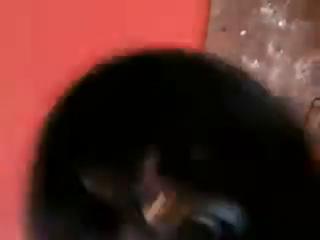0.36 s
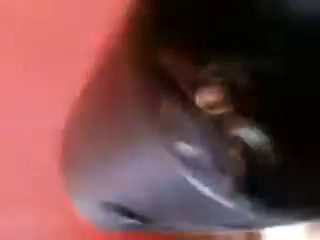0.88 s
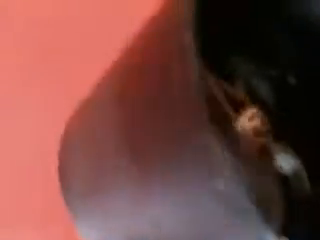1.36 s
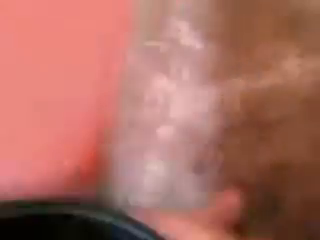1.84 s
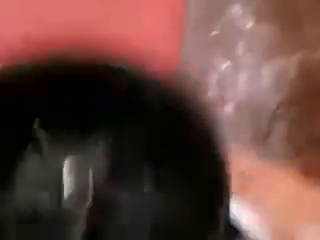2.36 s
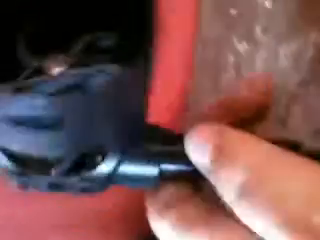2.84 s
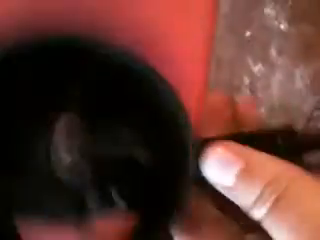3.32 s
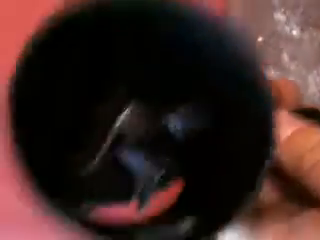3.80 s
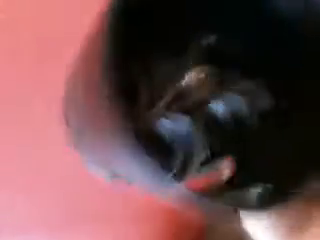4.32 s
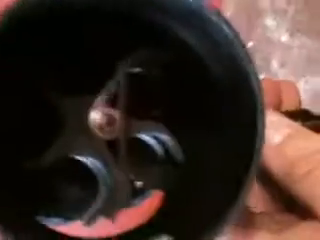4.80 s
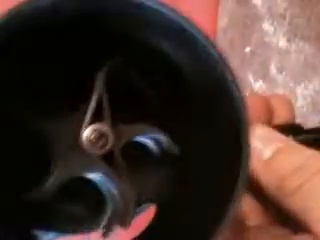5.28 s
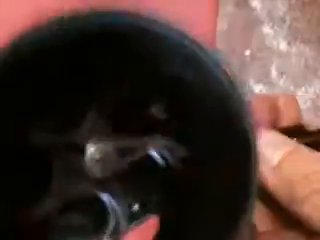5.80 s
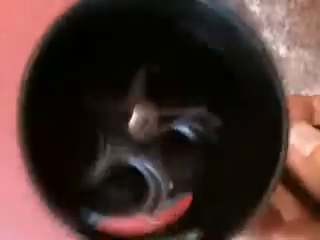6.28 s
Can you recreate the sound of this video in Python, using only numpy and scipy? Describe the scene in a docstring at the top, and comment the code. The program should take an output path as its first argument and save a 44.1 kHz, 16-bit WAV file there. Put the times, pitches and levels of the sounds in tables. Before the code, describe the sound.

Outdoors, very close to a small, thin-sounding microphone, an empty paintball marker is worked by hand over a faint far wash, wavering hiss and barely audible high whine. Tiny ticks and soft rubs open it. At 0.95 s the bolt slams with a loud, hard clack, ringing the hollow plastic hopper. Rubbing follows, then at 1.86 s a sharp strike releases a short whistling gas burst, with a weak thud. From 2.2 to 2.6 s only faint rustles; light knocks from 2.8 s. A quick scrape leads to a clack at 3.57 s, then ticks and rubs. The pace quickens: gas burst at 4.37, squeaky slide and deep clack at 4.8, burst at 5.1, clack at 5.45, burst at 5.87, clack at 6.24 s. Bursts die within about a tenth of a second, thuds just after. Short wall echoes trail; small knocks and a rub end it around 6.6 s.

```python
"""A paintball marker's bolt slams home with a clack that rings the hollow plastic hopper.
Blows are short bursts of noise plus fading tones; the bolt's slides and rubbing hands are uneven noise.
The empty marker is worked by hand close to a small microphone, and gas bursts out as whistling noise.
Outdoors, a wall echoes it all, over faint rustles, a quiet far wash, a nearer hiss and a thin whine."""
import sys
import numpy as np
from scipy import signal
from scipy.fft import rfft, irfft
from scipy.io import wavfile
from scipy.ndimage import uniform_filter1d

SR = 44100
rng = np.random.default_rng(int(sys.argv[2]) if len(sys.argv) > 2 else 0)


def to_wav(s):
    """Save 16-bit WAV."""
    ch = np.atleast_2d(s).T  # columns
    pcm = np.round(np.clip(ch, -1, 1) * 32767)  # PCM
    wavfile.write(sys.argv[1], SR, pcm.astype(np.int16))


def gain_from_db(level_db):
    """Convert decibel levels to linear amplitude factors (20 dB per decade)."""
    decades = np.asarray(level_db, float) / 20
    return 10 ** decades


N = 293020  # length in samples

# The tones (modes) that the body and hopper ring with.
# Each row: pitch in Hz, relative level in dB, basic ring time in seconds.
BODY_MODES = [(179.2, 0.5, 0.19), (220.3, 9, 0.12), (283.6, 8.5, 0.14), (366, 6, 0.026), (381.5, 5.5, 0.13),
              (442.4, -7.5, 0.13), (503.3, -3, 0.16), (589, 8, 0.056), (707, -4, 0.18), (830, -5, 0.12),
              (1135, 0.5, 0.091), (1410, -18.5, 0.066), (1640, -15, 0.15), (2050, -16.5, 0.13)]


def evened(x):
    """Scales a sound to an average strength (rms) of 1."""
    return x / np.sqrt(np.mean(x ** 2) + 1e-20)


def read(points, hz):
    """Reads a table between its points, with pitch on a log scale as we hear it."""
    f, value = np.transpose(points)
    return np.interp(np.log(hz + 1), np.log(f + 1), value)


def add(mix, s, sound):
    """Mixes a sound in at second s."""
    part = mix[max(round(s * SR), 0):][:len(sound)]
    part += sound[:len(part)]


def noise(spectrum):
    """Random noise of rms 1, coloured by a table of level against pitch."""
    hz = np.fft.rfftfreq(N, 1 / SR)
    white_spectrum = rfft(rng.standard_normal(N))
    return evened(irfft(white_spectrum * gain_from_db(read(spectrum, hz)), N))


def resonate(x, hz, width):
    """A resonance of gain 1: shifts the pitch hz down to zero, smooths, and shifts back."""
    turn = np.exp(2j * np.pi * np.cumsum(hz * np.ones(len(x))) / SR)
    r = np.exp(-np.pi * width / SR)
    smooth = signal.lfilter([1 - r], [1, -r], x / turn + 1e-18)
    return 2 * (turn * smooth).real


def all_blows():
    """Lists blows as (s, crack dB, four mode group dB, favoured Hz, ring, brightness, crack length)."""
    # The bolt slams home. Each row: start in seconds, crack level in dB, deep modes in dB,
    # hopper modes in dB, upper modes in dB, deep mode favoured by the grip in Hz.
    slams = [(0.9544, 12, -13.5, -8.5, -8, 286.5), (3.5685, 13.5, -3.5, -8.5, -12, 223.2),
             (4.8051, 15, 5, -4.5, -7.5, 176), (5.454, 15, 0.5, -13, 0, 185),
             (6.243, 14.5, -11.5, -11.5, -4.5, 213)]
    # The hammer strikes the valve. Each row: start in seconds, crack level in dB, crack length as a factor.
    strikes = [(1.8631, -3.5, 1.4), (4.366, 7, 1.7), (5.1062, 9.5, 1.5), (5.8731, 6.5, 2.35)]
    # Ringing after a strike, against its crack: deep, hopper, shell and clank modes, all in dB.
    strike_ring = np.array((-25, -23, -18, -31.5))
    # The bolt, blown back, thuds on its stop. Each row: start in seconds, crack level in dB,
    # deep modes in dB, other modes in dB, favoured deep mode in Hz.
    thuds = [(1.9421, -33, -16, -36, 225), (4.442, -17, -5, -0.5, 278), (5.1306, -14, -4, -7.5, 207),
             (5.9255, -22.5, -3, -5, 215)]
    # Small parts tick. Each row: start in seconds, crack level in dB.
    ticks = [(0.0806, -32.5), (0.132, -36), (0.1433, -37), (0.2575, -40), (0.7998, -33.5), (3.6236, -27),
             (3.765, -30.5), (5.0579, -32.5), (6.493, -41)]
    # Ringing after a tick, against its crack: deep, hopper, shell and clank modes, all in dB.
    tick_ring = np.array((-17, -15.5, -24, -10.5))
    # Hands and latch knock on the body. Each row: start in seconds, crack level in dB,
    # deep modes in dB, hopper modes in dB, upper modes in dB.
    knocks = [(0.6225, -57, -34, -40, -39.5), (0.8469, -28.5, -33.5, -27, -35),
              (0.8762, -31, -36, -51, -54), (1.0106, -29, -39, -21, -30), (2.803, -46, -13.5, -50, -21),
              (2.8639, -52, -28, -47, -60), (3.2108, -56, -37.5, -56, -51),
              (3.2764, -51, -38.5, -30.5, -55.5), (3.5253, -34, -35.5, -29.5, -22.5),
              (3.798, -35, -55.5, -23, -26.5), (4.6515, -33, -25.5, -21, -22.5),
              (4.6659, -27.5, -35.5, -37, -22), (4.7674, -40, -25, -31.5, -14.5),
              (4.9592, -47, -26, -25.5, -26.5), (5.3297, -45.5, -22.5, -28, -28),
              (5.3445, -17, -33.5, -12, -16.5), (5.4136, -31, -27.5, -21, -11),
              (6.0771, -34, -24.5, -27, -31), (6.203, -26, -29, -27, -13.5),
              (6.3694, -31, -35, -20.5, -36.5)]
    grip_hz, strike_grip_hz = 238, 247  # deep mode favoured by the usual grip, and in a strike
    # each kind of blow: ring length as a factor, brightness of the crack 0-1, crack length as a factor
    slam, thud, tick, knock = (0.94, 0.38, 0.8), (0.46, 0.12, 1.7), (0.96, 0.52, 1.9), (0.75, 0.3, 1.7)
    strike = (0.59, 0.78)  # ring length and brightness only
    # within the upper modes, one group is weaker: shell in slams, clank in thuds and knocks
    slam_shell_db, thud_clank_db, knock_clank_db = -3.5, -8.5, -6
    hits = [(s, c, deep, hopper, up + slam_shell_db, up, hz, *slam) for s, c, deep, hopper, up, hz in slams]
    hits += [(s, c, *(c + strike_ring), strike_grip_hz, *strike, long) for s, c, long in strikes]
    hits += [(s, c, deep, up, up, up + thud_clank_db, hz, *thud) for s, c, deep, up, hz in thuds]
    hits += [(s, c, *(c + tick_ring), grip_hz, *tick) for s, c in ticks]
    hits += [(s, c, deep, hopper, up, up + knock_clank_db, grip_hz, *knock)
             for s, c, deep, hopper, up in knocks]
    return hits


def blows():
    """Each blow is a short noisy crack and rattle, and rings four groups of body modes."""
    # Colour of the crack. Each row: pitch in Hz, relative level in dB per Hz.
    crack_colour = [(880, -1), (1500, -1), (2790, -5), (3410, 4), (4640, -3), (5240, 1.5), (6660, -4),
                    (7360, -1.5), (14700, -15), (16400, -18.5)]
    out, crack, t = np.zeros(N), np.zeros((2, N)), np.arange(SR // 2) / SR
    hz, db, t60 = np.transpose(BODY_MODES)[:, :, None]
    group = np.digitize(hz[:, 0], [320, 460, 800])  # deep, hopper, shell, clank
    hits = all_blows()
    chances = rng.standard_normal((len(hits), 2, len(BODY_MODES), 1))
    # a short random noise roughens and varies the start of each ring
    roughness = 0.015 * rng.standard_normal((len(hits), 900)) * gain_from_db(-60 * t[:900] / 0.27)
    roughness[:, 0] = 1  # keeps the plain ring as well
    for hit, (uneven, detune), rough in zip(hits, chances, roughness):
        s, crack_db, *group_db, grip_hz, ring, bright, long = hit
        level = gain_from_db(np.array(group_db)[group][:, None] + db + 1.5 * uneven)
        quick_loss = gain_from_db(-60 * t / (0.57 * t60 * ring))
        after_ring = gain_from_db(-14 - 3.8 * np.log2(hz / 200) - 60 * t / (1.3 * t60 * ring))
        level = level * (quick_loss + after_ring)
        # the hand damps the other deep modes
        level *= gain_from_db(-14 * np.abs(np.log2(hz / grip_hz)) * (hz < 320))
        # a single low bass push, 5 ms long
        push = np.sin(np.pi * np.minimum(t / 0.005, 1))
        add(out, s, gain_from_db(group_db[0] - 25.5) * push)
        swing = 1 - np.exp(-t * hz)  # each mode swings up within about a cycle
        pitch = hz * (1 + 0.012 * detune)
        ringing = (level * swing * np.sin(2 * np.pi * pitch * t)).sum(0)
        add(out, s, signal.fftconvolve(ringing, rough))
        # a soft noise swells up in the last few milliseconds before the crack
        swell_in = gain_from_db(-60 * t[:round(0.008 * SR)][::-1] / 0.014 - 21)
        share = np.clip(bright, 0, 1)
        # hard blows rattle on, and the treble rattle dies first
        for band, weight, tail in zip(crack, (1 - share, share), (0.13, 0.09)):
            snap = gain_from_db(-60 * t / (0.0072 * long))
            rattle = gain_from_db(-23 + 0.15 * crack_db - 60 * t / (tail * long))
            add(band, s - 0.007, weight * gain_from_db(crack_db + 3) * np.r_[swell_in, snap + rattle])
    hard = noise(crack_colour)
    hard = signal.sosfilt(signal.butter(2, 800, "highpass", fs=SR, output="sos"), hard)
    dull = signal.sosfiltfilt(signal.butter(2, 4600, fs=SR, output="sos"), hard)
    return out + crack[0] * evened(dull) + crack[1] * evened(hard - dull)


def strokes():
    """Scrape, rumble and squeak gain in time: a slide speeds up then brakes, a rub swells and fades."""
    # The bolt runs along its track. Each row: start in seconds, end in seconds, scrape in dB,
    # rumble in the body in dB, squeak in dB.
    slides = [(3.532, 3.561, -21.5, -24.5, -29.5), (4.762, 4.797, -16.5, -23.5, -9.5),
              (5.037, 5.103, -39.5, -23, -34), (5.408, 5.448, -17.5, -20, -12.5),
              (6.193, 6.236, -22, -19, -19)]
    # Hands and parts rub on the body. Each row: strongest moment in seconds, length in seconds,
    # scrape in dB, rumble in the body in dB, squeak in dB.
    rub_rows = [(0.016, 0.17, -71, -35, -62), (0.14, 0.1, -75, -46, -54), (0.633, 0.035, -49, -54.5, -43.5),
                (0.668, 0.11, -75, -34, -63), (0.873, 0.12, -41.5, -37, -68),
                (1.025, 0.17, -54, -38.5, -39), (1.171, 0.08, -56, -34, -49),
                (1.231, 0.067, -62, -34.5, -60), (1.367, 0.12, -62, -43, -67),
                (1.431, 0.031, -49.5, -43.5, -67), (1.542, 0.085, -40, -26.5, -29),
                (1.678, 0.095, -54, -36, -45), (2.818, 0.05, -70, -26, -74),
                (3.294, 0.16, -61, -38.5, -82.5), (3.528, 0.048, -36, -27.5, -55),
                (3.776, 0.035, -49, -35.5, -49), (3.795, 0.069, -41, -25.5, -49),
                (3.906, 0.08, -34, -23, -30.5), (3.94, 0.079, -53, -27, -58), (4.259, 0.21, -71, -40, -76),
                (4.649, 0.017, -73, -27.5, -34.5), (4.669, 0.054, -57, -28.5, -67),
                (4.915, 0.044, -35, -35, -41), (4.949, 0.077, -53, -25.5, -47),
                (5.568, 0.074, -51, -24, -55), (5.688, 0.14, -43.5, -24.5, -45),
                (6.073, 0.085, -49, -32, -60), (6.37, 0.16, -52, -33.5, -50), (6.53, 0.11, -36, -24.5, -65)]
    fastest = 0.65  # as a share of the run
    start_db, end_db, rumble_rise_db = -32.5, -8, 14.5
    rise, roundness, ends_db = 0.5, 1.16, -20  # share of a rub spent swelling; flatness of top; level at ends
    gains, t = np.zeros((3, N)), np.arange(N) / SR
    for start, end, scrape_db, rumble_db, squeak_db in slides:
        u = np.linspace(0, 1, round((end - start) * SR))  # progress along the run
        fade = signal.windows.tukey(len(u), 0.15)
        speed_db = np.interp(u, [0, fastest, 1], [start_db, 0, end_db])
        add(gains[0], start, fade * gain_from_db(scrape_db + speed_db))
        add(gains[1], start, fade * gain_from_db(rumble_db + rumble_rise_db * (u - 1)))
        add(gains[2], start, fade * gain_from_db(squeak_db + speed_db))
    for s, length, *dbs in rub_rows:
        near = abs(t - s) < 2 * length
        away = np.maximum((s - t[near]) / rise, (t[near] - s) / (1 - rise)) / length
        gains[:, near] += gain_from_db(np.array(dbs)[:, None] + ends_db * away ** roundness)
    return gains


def rubs():
    """Sliding parts scrape and squeak as uneven noise, and rumble by shaking the body modes."""
    # Colour of the scrape. Each row: pitch in Hz, relative level in dB per Hz.
    scrape_colour = [(1180, -28), (2000, -14.5), (2360, -13.5), (2630, -12.5), (4080, 0), (7820, -5),
                     (13900, -12), (15500, -19.5), (16400, -54.5)]
    scrape, rumble, squeal = strokes()
    slips = gain_from_db(evened(uniform_filter1d(rng.standard_normal(N), 120)))  # stick and slip
    # rough spots catch at random, about 350 a second, and let go within milliseconds
    catches = (rng.random(N) < 350 / SR) * rng.exponential(0.9, N)
    slips *= evened(1 + signal.lfilter([1], [1, -np.exp(-1 / (0.0015 * SR))], catches))
    white = rng.standard_normal(N)
    fast = np.clip(squeal / gain_from_db(-17.5), 0, 1)  # a hard, fast slide narrows the grit to a squeak
    grit = evened(resonate(resonate(white, 4100, 2400), 4100, 2400))
    narrow = evened(resonate(resonate(white, 4300, 450), 4300, 450))
    squeak = (1 - fast) * grit + fast * narrow
    shaken = sum(gain_from_db(db + 4.6 * np.log2(200 / hz)) * evened(resonate(white, hz, 1.6 / t60))
                 for hz, db, t60 in BODY_MODES)
    return slips * (scrape * noise(scrape_colour) + squeal * squeak) + rumble * evened(shaken)


def gas():
    """A weak leak, then the full burst of noise, dying away in uneven puffs through whistling ports."""
    # Gas bursts. Each row: start in seconds, relative strength in dB,
    # time for the rush to fade by 60 dB in seconds, whistle against that strength in dB.
    bursts = [(1.8635, -0.5, 0.15, -5), (4.3651, -0.5, 0.13, -2.5), (5.1054, -1.5, 0.15, -6),
              (5.8691, -0.5, 0.13, -6.5)]
    # Colour of the rushing gas. Each row: pitch in Hz, relative level in dB per Hz.
    gas_colour = [(180, -61.5), (300, -4), (405, -9.5), (952, -15), (1830, -14.5), (2510, -17),
                  (6100, -15.5), (7460, -18), (14600, -5.5), (16400, -19)]
    # Barrel and valve whistles. Each row: pitch in Hz, width in Hz, level in dB.
    ports = [(7300, 300, -1.5), (7850, 550, -7)]
    flow, lingering, t = np.zeros(N), np.zeros(N), np.arange(SR // 2) / SR
    for s, db, t60, whistle_db in bursts:
        leak = np.linspace(0, 1, round(0.004 * SR))
        add(flow, s - 0.004, gain_from_db(db - 18) * leak)
        add(flow, s, gain_from_db(db - 4.5 - 60 * t / t60))
        add(lingering, s, gain_from_db(db + whistle_db - 60 * t / (1.39 * t60)))  # the whistle fades more slowly
    puffs = gain_from_db(2.6 * evened(uniform_filter1d(rng.standard_normal(N), 70)))
    white = rng.standard_normal(N)
    whistle = sum(gain_from_db(db) * evened(resonate(white, hz, width)) for hz, width, db in ports)
    return puffs * flow * noise(gas_colour) + lingering * whistle


def wall(x):
    """Sparse echoes off wall and ground, each band dying at its own speed, in a slowly changing pattern."""
    # How long the echoes last. Each row: pitch in Hz, time to fade by 60 dB in seconds.
    echo_times = [(150, 0.38), (600, 0.44), (2500, 0.23), (8000, 0.25), (15000, 0.22)]
    # the pattern slowly blends between three random ones, so blows do not repeat the same echo
    blend_s = 0.9  # seconds for half a turn of the blend
    taps = np.zeros((3, SR // 2))
    at = np.arange(200, SR // 2 - 20, 20)
    places = at + rng.integers(0, 20, (3, len(at)))
    signs = rng.choice([-1., 1.], (3, len(at)))
    np.put_along_axis(taps, places, signs, 1)
    hz, t, z = signal.stft(taps, SR, nperseg=256)
    fading = z * gain_from_db(-60 * t / read(echo_times, hz)[:, None])
    tails = signal.istft(fading, SR, nperseg=256)[1]
    turn = np.pi * (np.arange(N) / SR / blend_s + np.arange(3)[:, None] / 3)
    feeds = x * np.sqrt(2 / 3) * np.cos(turn)
    return signal.fftconvolve(feeds, tails / np.linalg.norm(tails[0]), axes=1).sum(0)[:N]


def rustles():
    """Short soft swells of treble noise."""
    # Faint rustles. Each row: strongest moment in seconds, length in seconds, level in dB.
    swells = [(1.4, .04, -54), (2.22, 0.11, -55), (2.348, 0.051, -46.5), (2.487, 0.066, -54),
              (2.557, 0.11, -56)]
    # Colour of the rustles. Each row: pitch in Hz, relative level in dB per Hz.
    rustle_colour = [(3000, -16), (5500, -9), (7800, 0), (9800, -8), (12000, -1.5), (15000, -8),
                     (16400, -30)]
    t = np.arange(N) / SR
    # half a length away from its peak, a swell is 20 dB weaker
    gain = sum(gain_from_db(db - 20 * (2 * (t - s) / length) ** 2) for s, length, db in swells)
    return noise(rustle_colour) * gain


def wash():
    """Far outdoor noise that gently wavers, a nearer hiss that comes and goes, and a thin steady whine."""
    # Colour of the far wash. Each row: pitch in Hz, relative level in dB per Hz.
    wash_colour = [(18, -83.5), (30, -34.5), (86, -33), (106, -9), (241, -4), (275, -1.5), (314, -7.5),
                   (622, -1.5), (769, -1.5), (1000, -13.5), (1140, -13), (4740, -22), (14700, -31),
                   (16400, -39)]
    # The nearer hiss over time. Each row: time in seconds, level in dB.
    near_levels = [(0.0, -53), (0.41, -57.5), (1.11, -51.5), (1.76, -58), (3.24, -62.5), (3.81, -49.5),
                   (3.99, -62.5), (4.75, -53), (4.97, -51), (6.64, -59)]
    # Colour of the nearer hiss. Each row: pitch in Hz, relative level in dB per Hz.
    hiss_colour = [(700, -5), (1800, 3), (4000, -4.5), (6500, -6), (10000, -21)]
    # The whine, one row: pitch in Hz, width of its fuzz in Hz, level in dB.
    hz, width, whine_db = (15050, 60, -65.5)
    wash_db = -49
    t = np.arange(N) / SR
    swell = gain_from_db(1.4 * evened(uniform_filter1d(rng.standard_normal(N), 5000)))
    fuzz = evened(resonate(rng.standard_normal(N), hz, width))
    whine = np.sin(2 * np.pi * hz * t) + 0.6 * fuzz
    near = gain_from_db(np.interp(t, *np.transpose(near_levels))) * noise(hiss_colour)
    return near + gain_from_db(wash_db) * swell * noise(wash_colour) + gain_from_db(whine_db) * whine


def scene():
    """The marker with its echoes, over the rustles and the wash."""
    marker = blows() + gas() + rubs()
    echoes = gain_from_db(-15) * wall(marker)
    return (marker + echoes + rustles() + wash())[None]


def low_pass(x):
    """Removes everything above the highest recorded frequency."""
    return signal.sosfilt(signal.butter(12, 16520, fs=SR, output="sos"), x)


def record(dry):
    """The small microphone loses deep bass and top treble; gain control ducks loud sounds; peaks clip."""
    thin = signal.sosfilt(signal.butter(2, 75, "highpass", fs=SR, output="sos"), dry)
    thin = signal.oaconvolve(thin, signal.firwin(255, 15800, fs=SR)[None], "same")
    # the origins make both averages look back only
    power_db = 10 * np.log10(abs(uniform_filter1d(thin[0] ** 2, 800, origin=399)) + 1e-12)
    fall = np.arange(N) * 109.4 / SR  # the remembered loudness falls 109.4 dB a second
    held_db = np.maximum.accumulate(power_db + fall) - fall
    over_db = np.maximum(held_db + 31, 0)  # above -31 dB the gain comes down
    ducked = thin / gain_from_db(0.11 * uniform_filter1d(over_db, 600, origin=299))
    clipped = ducked / (1 + abs(ducked / 1.04) ** 10) ** (1 / 10)  # a short soft knee
    return low_pass(clipped)


dry = scene()
out = record(dry)
to_wav(out)
```